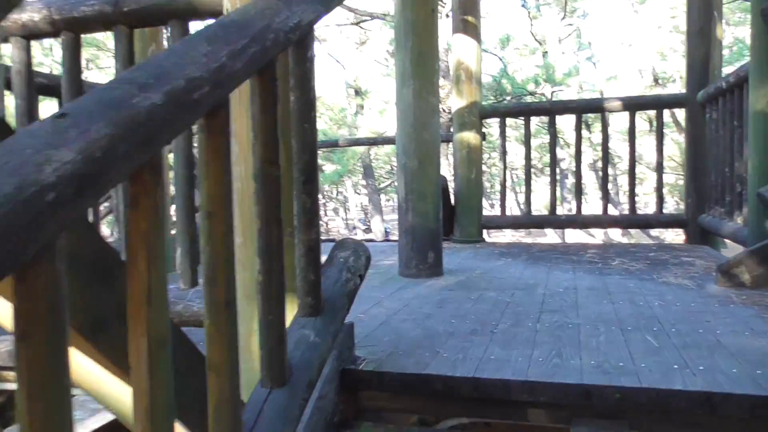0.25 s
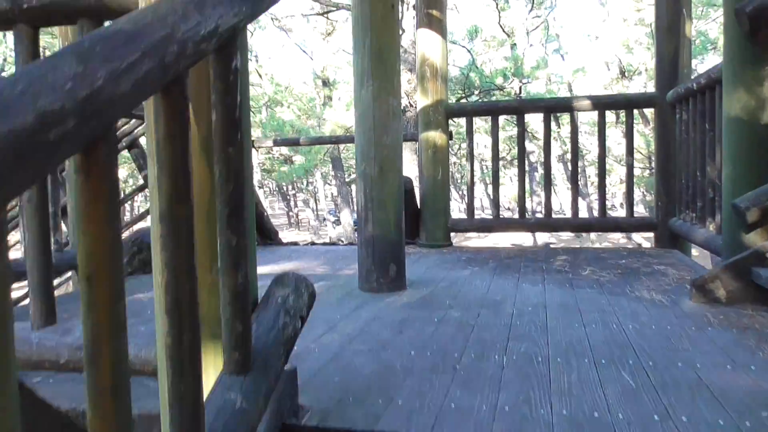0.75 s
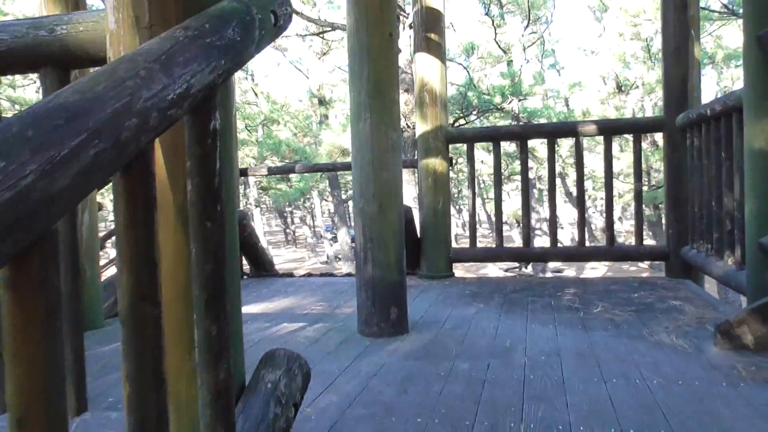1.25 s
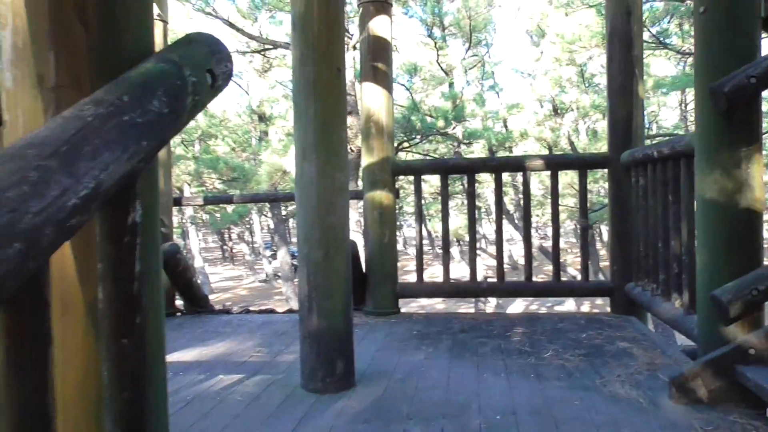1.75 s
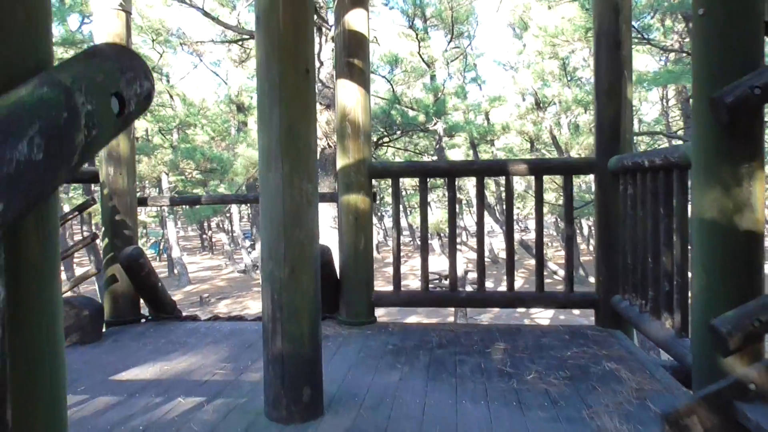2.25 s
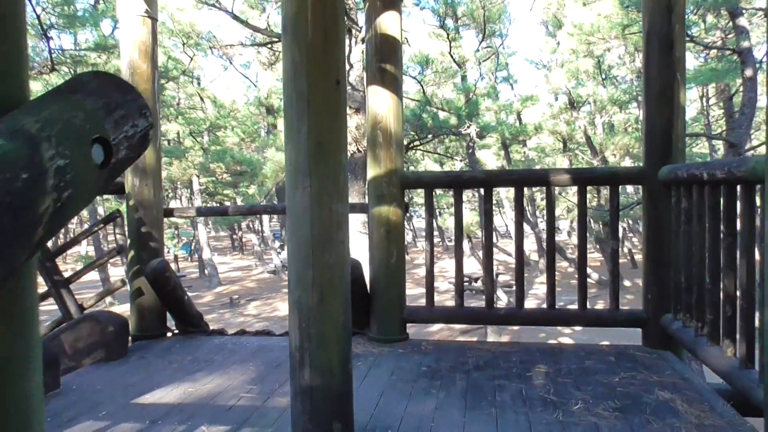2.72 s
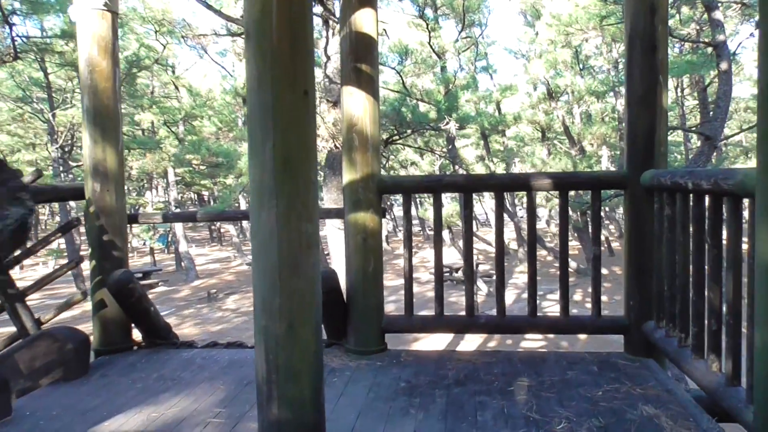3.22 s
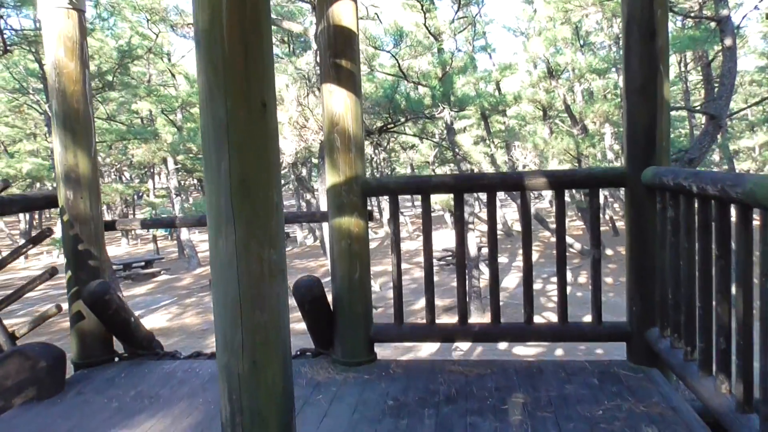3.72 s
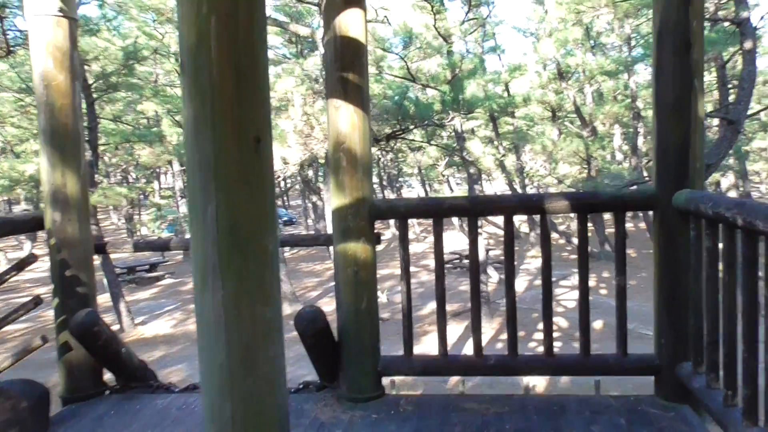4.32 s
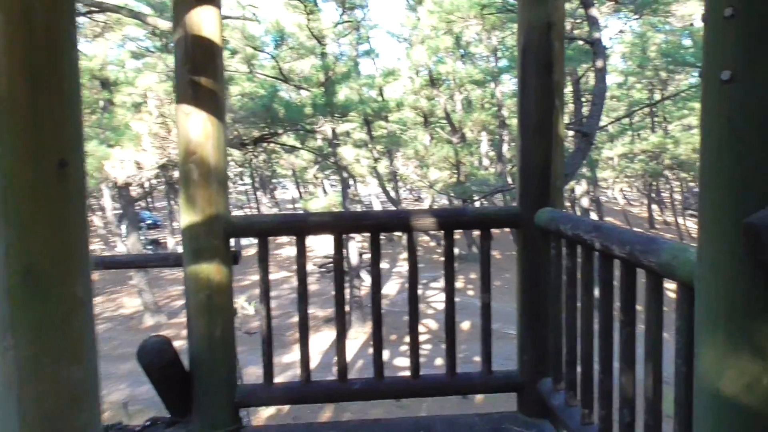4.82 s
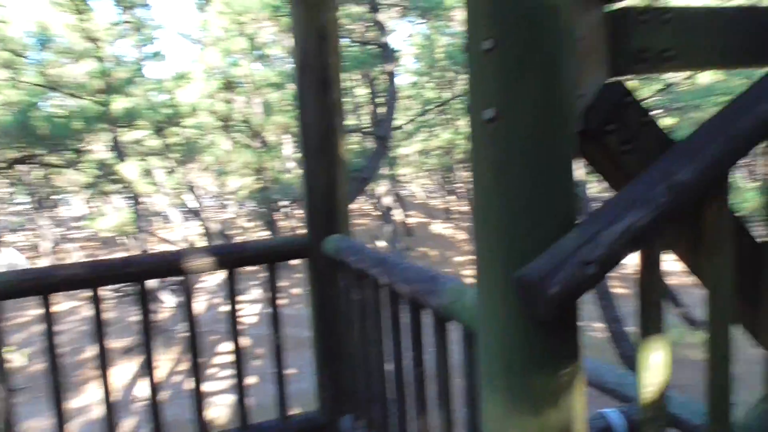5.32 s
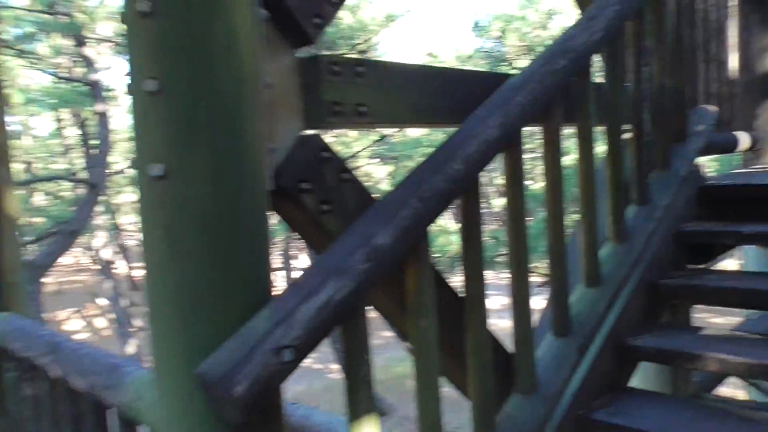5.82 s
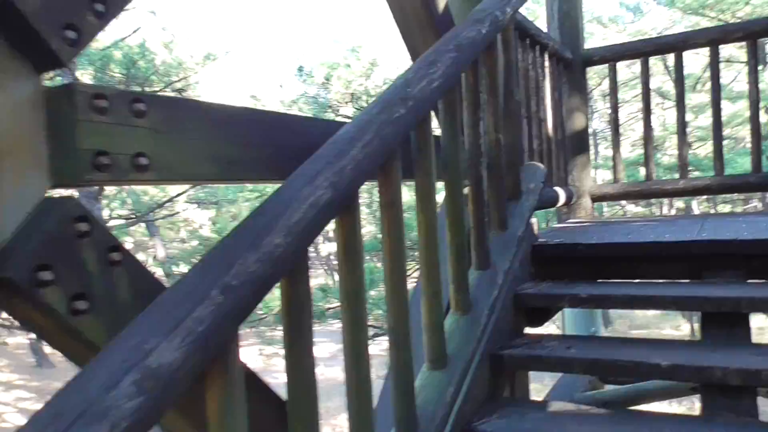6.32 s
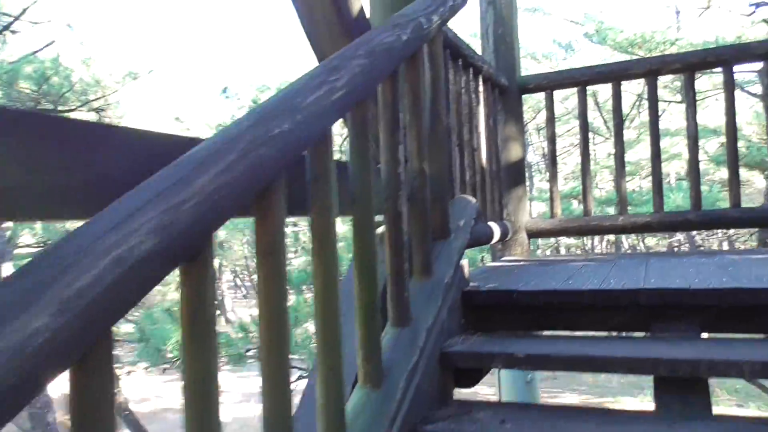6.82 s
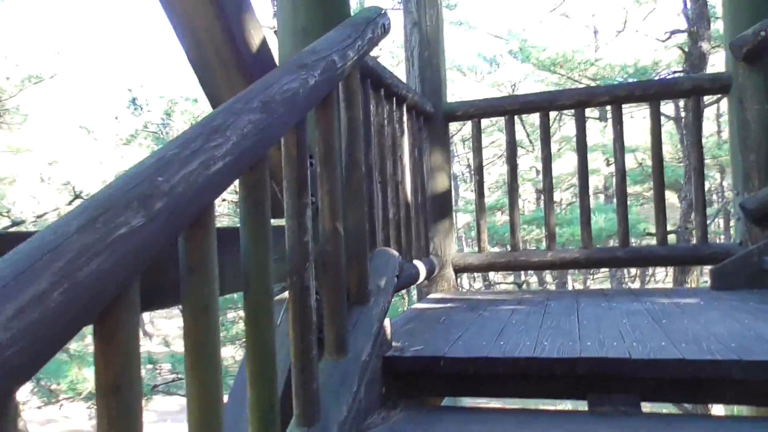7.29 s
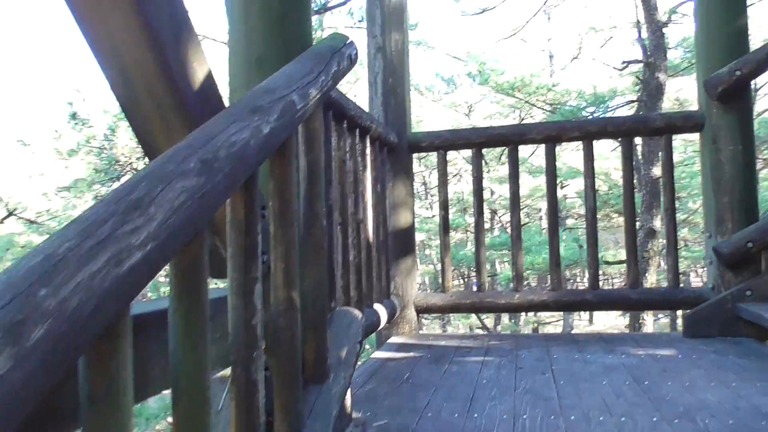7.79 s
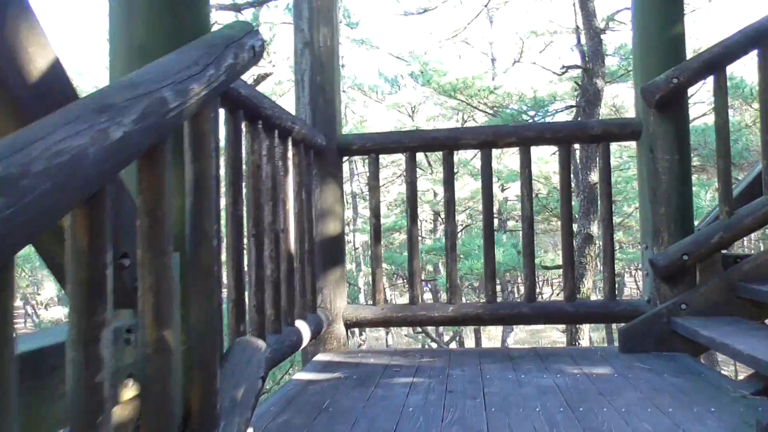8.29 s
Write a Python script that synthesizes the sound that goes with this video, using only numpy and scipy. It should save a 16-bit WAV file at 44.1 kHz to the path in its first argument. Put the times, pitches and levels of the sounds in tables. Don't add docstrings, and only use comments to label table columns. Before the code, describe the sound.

Steady, uneven-strength footsteps knock on wooden treads, louder at first then softer after a landing, with buckle ticks, fabric swishes and quiet outdoor air.

```python
import sys
import numpy as np
from scipy import signal
from scipy.fft import rfft, irfft, next_fast_len
from scipy.io import wavfile
from scipy.ndimage import uniform_filter1d, map_coordinates

SR = 44100
rng = np.random.default_rng(int(sys.argv[2]) if len(sys.argv) > 2 else 0)


def generate_wav(signal):
    frames = np.transpose(np.atleast_2d(signal))
    scaled = np.clip(frames, -1, 1) * 32767
    pcm = np.round(scaled).astype(np.int16)
    wavfile.write(sys.argv[1], SR, pcm)


def volts(x):
    e = np.asarray(x, float) / 20
    return 10 ** e


N = 377055


def unit(x):
    return x / np.sqrt(np.mean(x ** 2) + 1e-20)


def along(points, hz):
    f, v = np.transpose(points)
    return np.interp(np.log(hz + 1), np.log(f + 1), v)


def wobble(rate):
    return map_coordinates(rng.standard_normal(N // 400), [np.arange(N) * rate / SR])


def filtered(x, response):
    m = next_fast_len(x.shape[-1] + 8192)
    return irfft(rfft(x, m) * response(np.fft.rfftfreq(m, 1 / SR)), m)[..., :x.shape[-1]]


def add(track, s, sound):
    track[:, round(s * SR):][:, :sound.shape[1]] += sound


def ring(modes, t, scatter_db, detune, attack):
    hz, db, t60 = np.transpose(modes)[:, :, None]
    luck = rng.standard_normal((2, len(modes), 1))
    decay = volts(db + scatter_db * luck[0] - 60 * t / t60)
    waves = decay * np.sin(2 * np.pi * hz * (1 + detune * luck[1]) * t)
    return waves.sum(0) * (1 - np.exp(-t / attack))


def rush(spectrum, patchy_db):
    # frequency in Hz, left-right likeness from 0 to 1
    alike = [(60, 0.53), (150, 0.94), (380, 0.83), (950, 0.44), (2380, 0.71), (5980, 0.58), (10000, 0.26),
             (15000, 0.38)]
    # frequency in Hz, left over right in dB
    lean = [(60, 0), (150, 4), (380, 2.5), (950, 2.5), (2380, 1), (5980, 1.5), (15000, -0.5)]
    # frequency in Hz, phase by which left leads in radians
    lead = [(0, 1), (6290, -0.41), (8010, 0.5), (11400, -1), (14300, 2.2), (16100, -2)]
    z = signal.stft(rng.standard_normal((2, N)), nperseg=512)[2]
    field = uniform_filter1d(rng.standard_normal(z.shape[1:]), size=6, axis=0)
    field = uniform_filter1d(field, size=10, axis=1)
    pair = signal.istft(z * volts(patchy_db * unit(field)), nperseg=512)[1][:, :N]

    def mid_side(hz):
        turn = np.arccos(np.clip(along(alike, hz), 0, 1)) / 2
        return volts(along(spectrum, hz)) * [np.cos(turn), np.sin(turn)]

    def left_right(hz):
        ratio = volts(along(lean, hz)) * np.exp(1j * along(lead, hz))
        return ratio ** [[.5], [-.5]]

    mid, side = filtered(pair, mid_side)
    return unit(filtered(np.array([mid + side, mid - side]), left_right))


def tread_knock(t, db, hz, edge_db, edge_hz):
    # multiple of the tread pitch, level in dB, t60 in seconds
    body = [(.6, -11.5, 0.17), (1, 3.5, 0.067), (1.33, -5, 0.17), (1.7, -14, 0.085)]
    # multiple of the edge pitch, level in dB, t60 in seconds
    slap = [(.62, 4.5, 0.039), (.8, 0.5, 0.026), (1, 7.5, 0.021), (1.22, -2.5, 0.026), (1.5, -37, 0.0039),
            (1.8, -27, 0.03)]
    stilled_s = 0.0085
    knock = volts(db - 2.0) * ring(np.multiply(body, [hz, 1, 1]), t,
                                 scatter_db=1.43, detune=0.013, attack=0.00071)
    knock += volts(db + edge_db - 6.5) * ring(np.multiply(slap, [edge_hz, 1, 1]), t,
                                            scatter_db=4.0, detune=0.055, attack=0.00099)
    return knock * np.exp(-(t / stilled_s) ** 3)


def frame_response():
    # frequency in Hz, t60 in seconds
    decay = [(100, 0.66), (350, 0.18), (700, 0.22), (1500, 0.15), (3000, 0.2)]
    alike, delay_s = 0.93, 0.005
    shared, left, right = rng.standard_normal((3, SR // 3))
    noise = alike * shared + np.sqrt(1 - alike ** 2) * np.array([left, right])
    hz, t, z = signal.stft(noise, SR, nperseg=512)
    tail = signal.istft(z * volts(-60 * t / along(decay, hz)[:, None]), SR, nperseg=512)[1]
    return tail * (1 - np.exp(-np.arange(tail.shape[1]) / SR / delay_s))


def frame_ring(t, knock, over_db):
    joint_low_hz, joint_hz = 200, 1080
    frame_db, frame_grows = -8, 0.75
    blow = knock * np.exp(-t / 0.0024)
    after = signal.fftconvolve(blow[None], frame_response(), axes=1)
    after = filtered(after, lambda f: 1j * f / (joint_low_hz + 1j * f) / (1 + 1j * f / joint_hz))
    level = volts(frame_db + (frame_grows - 1) * over_db + 8.5)
    return after * level * np.linalg.norm(knock) / np.linalg.norm(after)


def joist_thud(t, db):
    # frequency in Hz, level in dB, t60 in seconds
    joists = [(72, -7, 0.52), (99.5, -2, 0.23), (131, -26, 0.12), (161.5, 11.5, 0.15), (187.4, -1, 0.18)]
    return volts(db - 3.5) * ring(joists, t, scatter_db=3.0, detune=0.14, attack=0.0095)


def tower_sway(t, db):
    # frequency in Hz, level in dB, t60 in seconds
    sway = [(31.8, 3.5, 1.42), (47.4, 4, 0.88)]
    return volts(db) * ring(sway, t, scatter_db=0.5, detune=0.0066, attack=0.021)


def steps():
    # start in seconds, peak in dB, tread pitch in Hz,
    # heel edge under the peak in dB, edge pitch in Hz
    footfalls = [(0.630, -27.5, 317, -4.5, 1190), (1.337, -9, 463, -13.5, 1210),
                 (2.075, -24.5, 363, -12, 980), (2.769, -13, 400, -9, 1530), (3.475, -15, 293, -4.5, 1467),
                 (4.2187, -9, 402.5, -21, 1087), (4.996, -24, 346, -9, 900), (5.96, -26.5, 277, -18, 940),
                 (6.747, -26.5, 322, -20, 950), (7.529, -25, 340, -5.5, 1000),
                 (8.266, -21.5, 414, -10, 1034)]
    # start in seconds, peak in dB, tread pitch in Hz,
    # edge under the peak in dB
    touches = [(0.004, -39, 390, -5), (0.028, -44, 290, 0), (0.638, -27, 215, -24), (0.657, -37, 200, -9),
               (1.422, -36.5, 315, 2), (2.062, -31.5, 367, -12), (2.349, -43, 295, -12),
               (2.869, -46, 342, 5), (3.953, -62, 500, -2), (4.311, -46, 300, -8), (5.022, -31, 340, -6),
               (5.269, -58, 288, -20), (6.061, -37, 390, -4), (6.086, -45.5, 393, 1), (6.742, -36, 316, -8),
               (6.803, -30.5, 281, -12), (6.88, -40, 410, 1.5), (7.518, -31.5, 257, -20),
               (8.259, -27.5, 325, -9)]
    # start in seconds, joist thud in dB, tower sway in dB
    floors = [
        (0, -18, -65),
        (3.9, -35, -74),
        (4.6, -20, -61),
        (5.5, -19, -78),
        (7.2, -47, -63),
    ]
    touch_edge_hz = 1003
    usual_db, thud_grows, sway_grows = -21.5, 0.57, 0.35
    track, rock = np.zeros((2, 2, N + 2 * SR))
    short, middle, long = np.arange(SR // 25) / SR, np.arange(SR // 3) / SR, np.arange(SR) / SR
    for s, db, hz, edge_db, edge_hz in footfalls + [(*row, touch_edge_hz) for row in touches]:
        thud_db, sway_db = [rest for start, *rest in floors if start <= s][-1]
        over_db = db - usual_db
        knock = tread_knock(short, db, hz, edge_db, edge_hz)
        after = frame_ring(short, knock, over_db)
        thud = joist_thud(middle, usual_db + thud_db + thud_grows * over_db)
        for part in (knock[None], after, thud[None]):
            add(track, s + .0005, part)
        add(rock, s, tower_sway(long, sway_db + sway_grows * over_db)[None])
    boards = filtered(track[:, :N], lambda f: (1j * f / (110 + 1j * f)) ** 2)
    return boards * volts([[1.4], [-1.4]]) + rock[:, :N] * volts([[.8], [-.8]])


def buckle():
    # start in seconds, peak in dB, left over right in dB
    ticks = [
        (0.7361, -18, -5.5),
        (2.326, -27.5, -5),
        (2.894, -34, -7),
        (5.1183, -18.5, -6),
        (5.676, -27, 5),
        (7.3003, -40, 2),
    ]
    # frequency in Hz, level in dB, t60 in seconds
    metal = [(7330, 1.5, 0.0049), (3520, -22, 0.0056), (4540, -9, 0.0039), (8500, -4.5, 0.0033),
             (10500, -14.5, 0.0037), (11600, -14, 0.0037), (13500, -19, 0.0034), (15500, -29, 0.0036)]
    track, t = np.zeros((2, N + SR)), np.arange(SR // 20) / SR
    for s, db, pan_db in ticks:
        tap = ring(metal, t, scatter_db=.7, detune=.004, attack=.0006)
        add(track, s, volts(db + 1.5) * tap * volts([[pan_db / 2], [-pan_db / 2]]))
    return track[:, :N]


def grit():
    # start in seconds, peak in dB, length in seconds
    crunches = [(0.032, -44.5, 0.013), (0.632, -49, 0.04), (0.652, -51, 0.02), (1.3383, -41.5, 0.039),
                (1.421, -46, 0.043), (1.494, -48, 0.022), (1.534, -54, 0.016), (2.0634, -42, 0.068),
                (2.7675, -41, 0.078), (2.872, -48, 0.02), (3.477, -39, 0.046), (4.2196, -39.5, 0.043),
                (4.307, -44, 0.021), (5.017, -46, 0.018), (5.987, -45, 0.018), (6.0714, -48, 0.037),
                (6.084, -47.5, 0.031), (6.115, -51, 0.017), (6.8756, -45, 0.045), (7.531, -46, 0.063),
                (8.033, -54, 0.017), (8.26, -46.5, 0.067)]
    # frequency in Hz, density in dB per Hz
    sole = [(500, -25), (1000, -16), (1700, -12), (2040, -14), (2900, -15), (4640, -15), (10800, -8.5),
            (16000, -23)]
    fine_db = -11
    gate, t = np.zeros((1, N + SR)), np.arange(SR // 4) / SR
    for s, db, length in crunches:
        decay = volts(db + 3.5 - 60 * t[None] / max(length, .003))
        add(gate, s, decay * (1 - np.exp(-t / 0.00037)))
    crunch = rush(sole, patchy_db=1.1)
    low = filtered(crunch, lambda hz: 1 / (1 + (6000 / (hz + 1)) ** 6))
    return gate[0, :N] * (crunch - low + volts(fine_db) * low)


def cloth():
    # start in seconds, length in seconds, level in dB
    swishes = [(0, 0.12, -65.5), (0.398, 0.41, -74.5), (1.028, 0.2, -69.5), (1.31, 0.34, -74),
               (1.836, 0.36, -76), (2.347, 0.31, -73.5), (2.682, .2, -70), (2.888, 0.15, -75),
               (3.25, .22, -71), (3.476, .2, -65), (4.0, 0.17, -80.5), (4.215, .16, -66), (4.62, .3, -70.5),
               (4.967, 0.17, -68.5), (5.17, 0.21, -75.5), (5.953, 0.22, -67), (6.24, 0.36, -72),
               (6.776, 0.18, -69), (7.226, 0.21, -70), (7.52, .25, -72.5), (8.063, 0.44, -78)]
    # frequency in Hz, density in dB per Hz
    rustle_spectrum = [(3240, -48), (5500, -18.5), (7460, -2), (10700, -2.5), (12000, -7.5), (15100, -18),
                       (15800, -28), (16400, -41)]
    # frequency in Hz, density in dB per Hz
    rub_spectrum = [(1000, -3), (1700, -60.5), (1800, 1), (2350, 3), (2770, -3.5), (4670, 4.5),
                    (5520, -3.5), (6500, 0), (8450, 0), (14300, -120)]
    rise_s, fall_s = .06, .035
    rest_db, rub_db, rub_grows = -73.5, -3, 1.25
    t = np.arange(N) / SR

    def edge(late, span):
        return .5 + .5 * np.tanh(2 * late / span)

    sweep = np.full(N, volts(rest_db))
    for s, length, db in swishes:
        sweep += volts(db) * edge(t - s, rise_s) * edge(s + length - t, fall_s)
    catches = 2.07 * wobble(30) + 0.55 * wobble(105)
    rustle = sweep * volts(0.5 + catches) * rush(rustle_spectrum, patchy_db=-1.0)
    rub = volts(-70 + rub_db + 0.97 * catches) * (sweep / volts(-70)) ** rub_grows
    return rustle + rub * rush(rub_spectrum, patchy_db=0.9)


def far_roar():
    # frequency in Hz, density in dB per Hz
    low_spectrum = [(26, -49), (45, -39), (91, -9), (102, -19), (123, -17), (160, -12.5), (284, -1),
                    (343, -4.5), (666, -14.5), (709, -19.5), (900, -23), (1170, -71), (1980, -120)]
    # frequency in Hz, density in dB per Hz
    upper_spectrum = [(350, -38), (600, -8), (709, -3.5), (808, -3), (1040, -4), (1800, -17), (2600, -20),
                      (4400, -120)]
    # centre in seconds, half length in seconds, change in dB
    lull = (5.58, 0.32, -5.5)
    low_db, upper_db = -58, -68
    gust, t = wobble(9), np.arange(N) / SR
    lull_db = lull[2] * np.exp(-((t - lull[0]) / lull[1]) ** 4)
    low = volts(low_db + lull_db + 1.5 + 1.1 * gust) * rush(low_spectrum, patchy_db=1.3)
    upper = volts(upper_db + lull_db + 1.85 + gust) * rush(upper_spectrum, patchy_db=3.0)
    return low + upper


def mains_hum():
    line = (120, -67)
    t = np.arange(N) / SR
    level = volts(line[1] + 1 + 0.17 * wobble(2.66))
    hum = level * np.sin(2 * np.pi * line[0] * t + .5 * wobble(10.0))
    return hum * volts([[.8], [-.8]])


def microphone_hiss():
    # frequency in Hz, density in dB per Hz
    hiss = [(24, -44), (40, -14), (109, -16), (163, -13), (283, -7), (1270, -16.5), (1760, -30),
            (10400, -31), (16000, -36)]
    return volts(-61.5) * rush(hiss, patchy_db=-2.0)


def scene():
    air_top_hz = 15800
    air = far_roar() + mains_hum() + microphone_hiss() + cloth() + grit()
    return steps() + buckle() + filtered(air, lambda hz: hz < air_top_hz)


def band_limit(x):
    return signal.sosfilt(signal.butter(12, 16500, fs=SR, output="sos"), x)


def record(dry):
    return band_limit(dry)


dry = scene()
out = record(dry)
generate_wav(out)
```